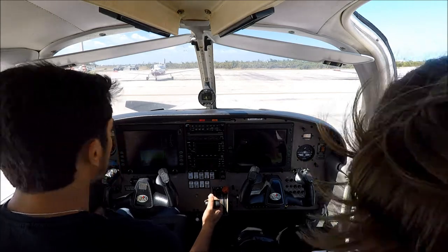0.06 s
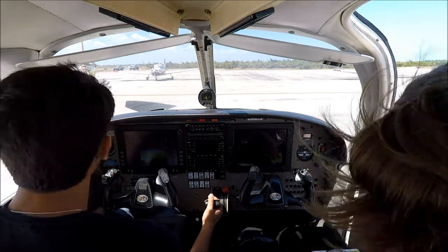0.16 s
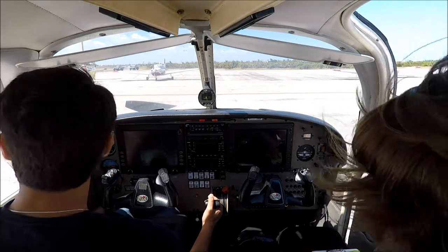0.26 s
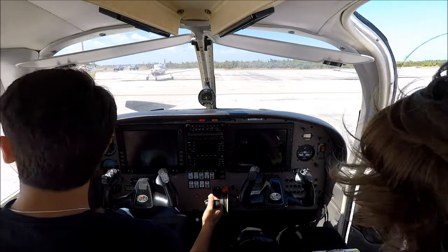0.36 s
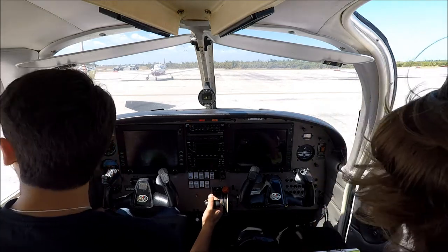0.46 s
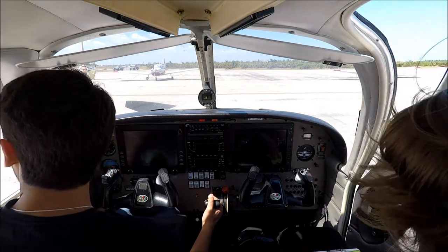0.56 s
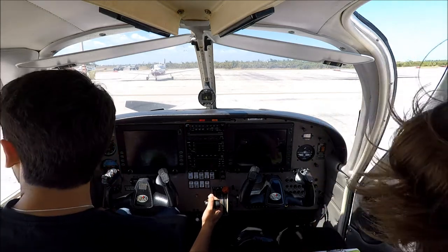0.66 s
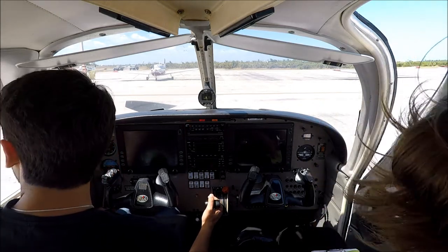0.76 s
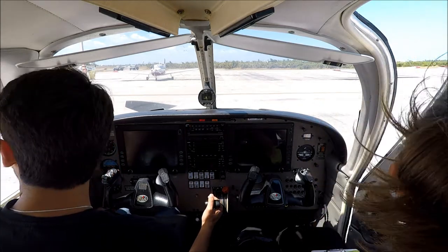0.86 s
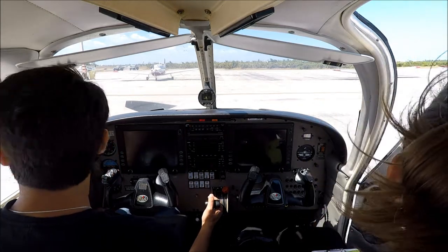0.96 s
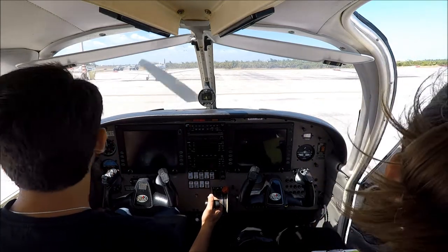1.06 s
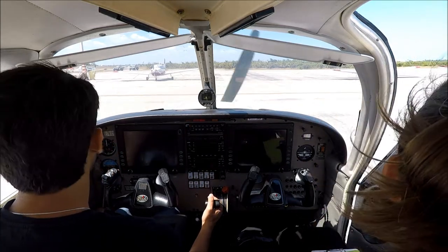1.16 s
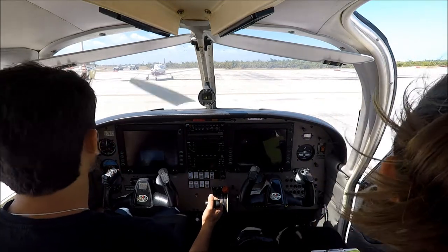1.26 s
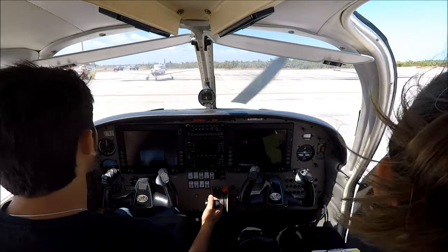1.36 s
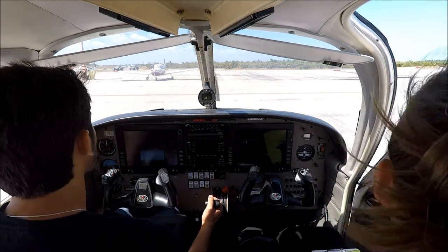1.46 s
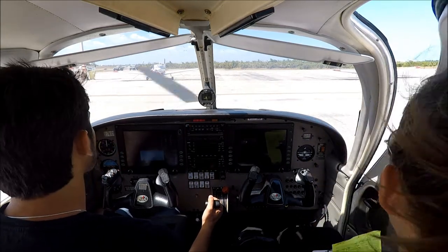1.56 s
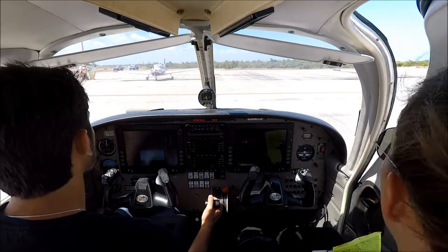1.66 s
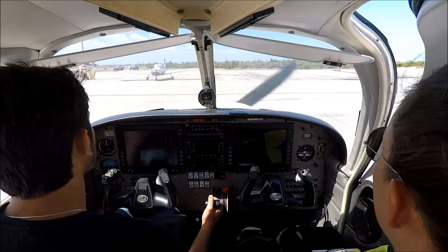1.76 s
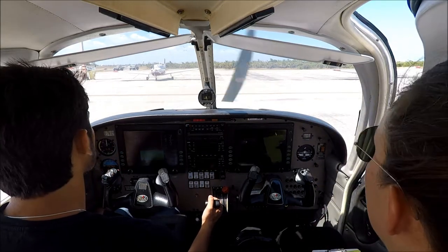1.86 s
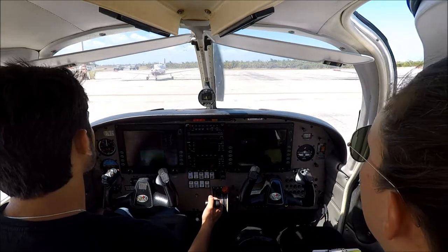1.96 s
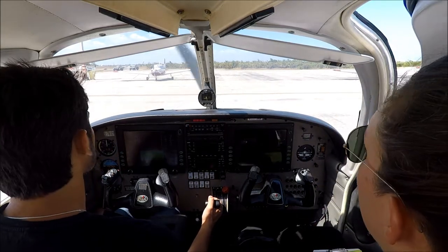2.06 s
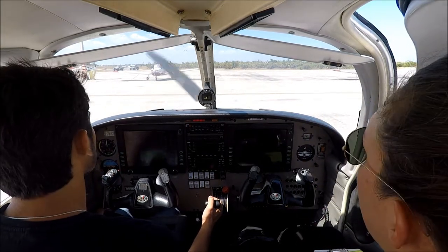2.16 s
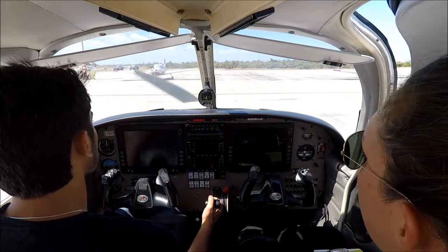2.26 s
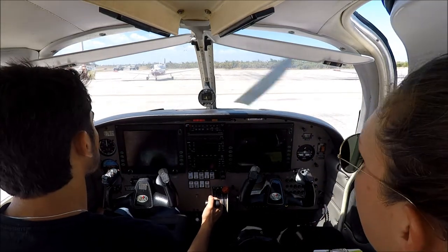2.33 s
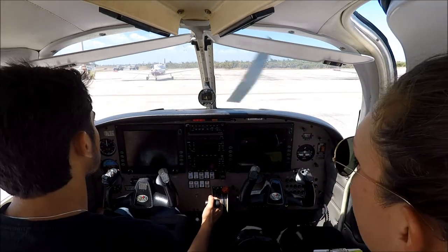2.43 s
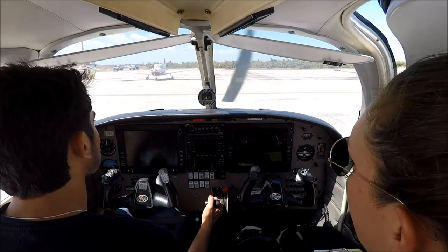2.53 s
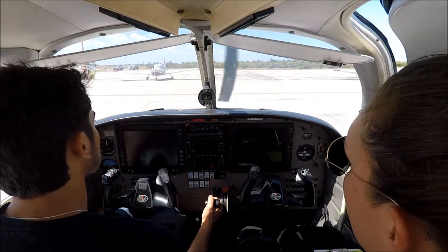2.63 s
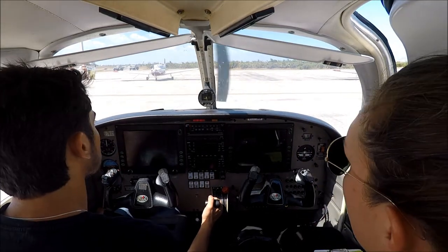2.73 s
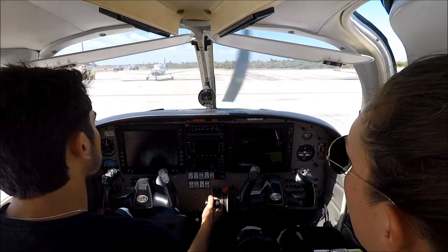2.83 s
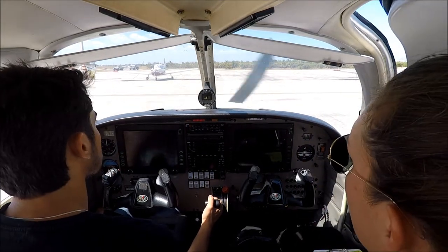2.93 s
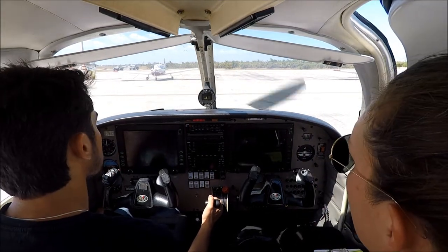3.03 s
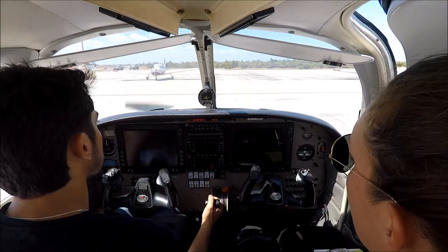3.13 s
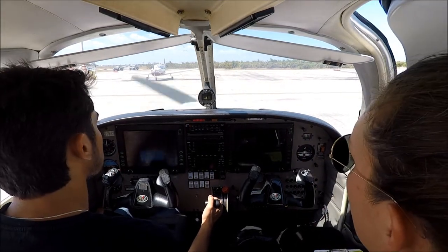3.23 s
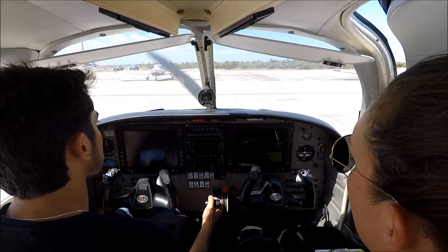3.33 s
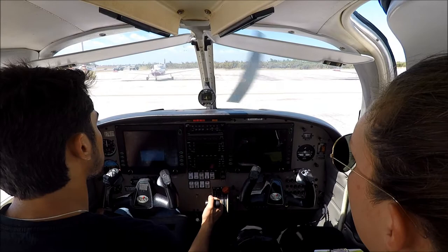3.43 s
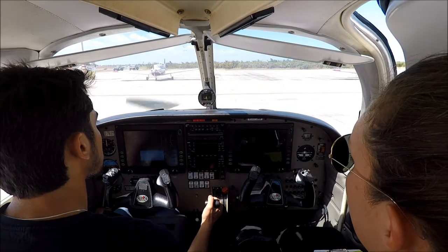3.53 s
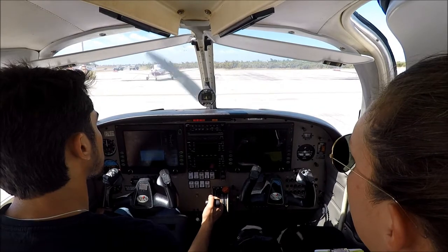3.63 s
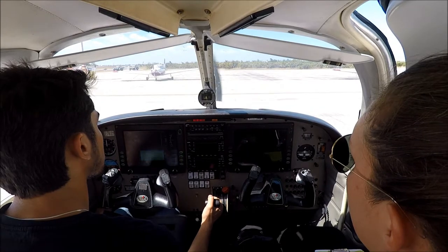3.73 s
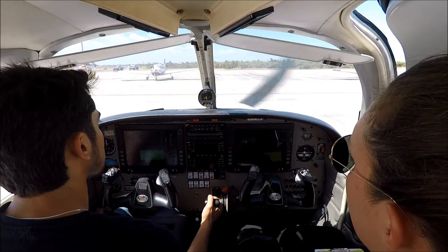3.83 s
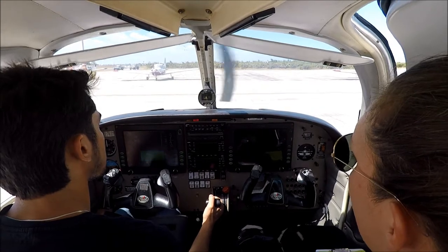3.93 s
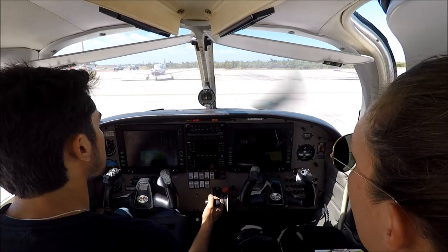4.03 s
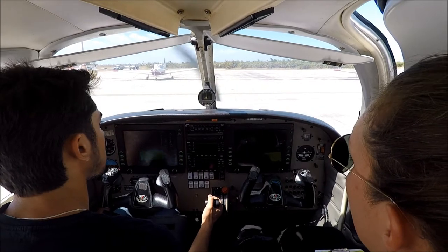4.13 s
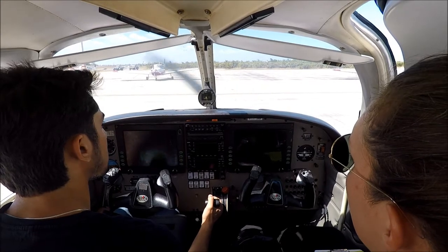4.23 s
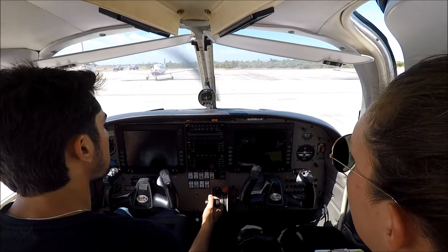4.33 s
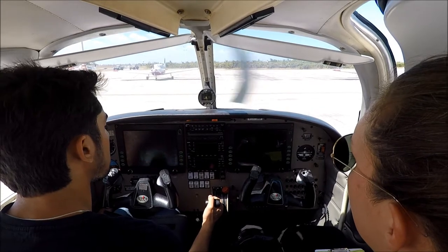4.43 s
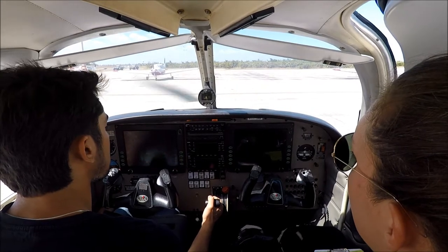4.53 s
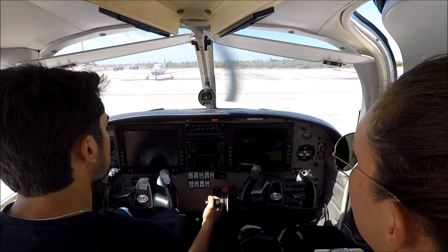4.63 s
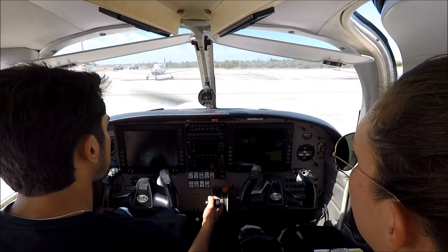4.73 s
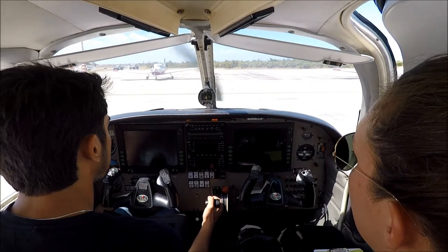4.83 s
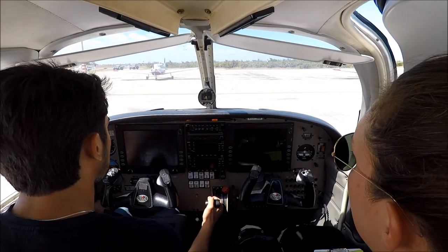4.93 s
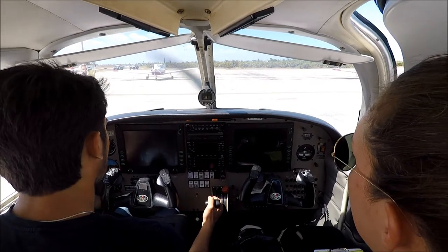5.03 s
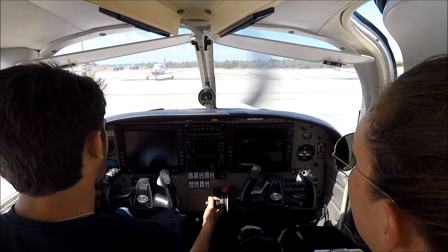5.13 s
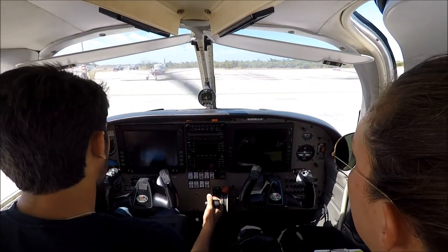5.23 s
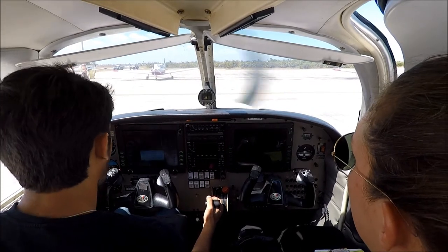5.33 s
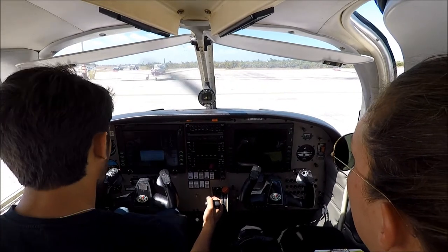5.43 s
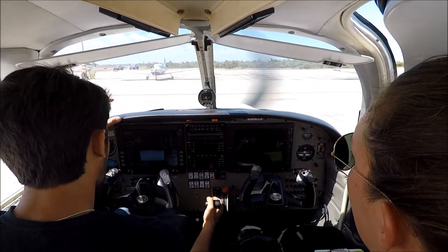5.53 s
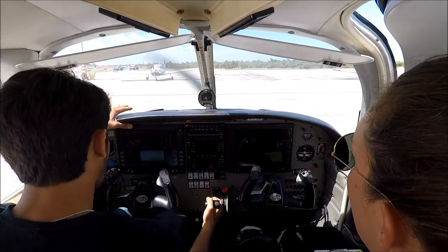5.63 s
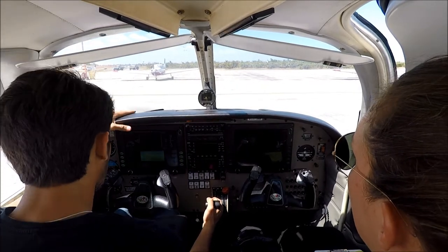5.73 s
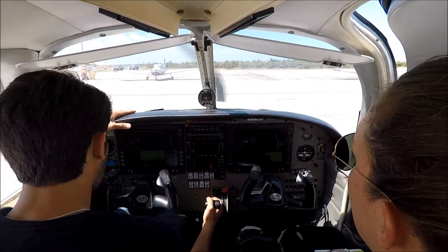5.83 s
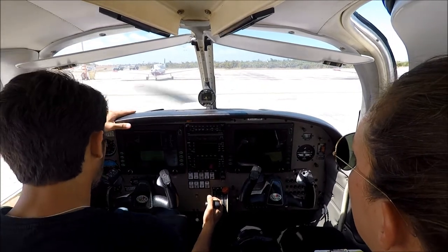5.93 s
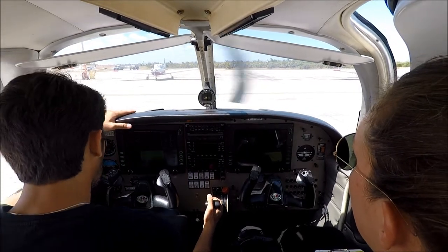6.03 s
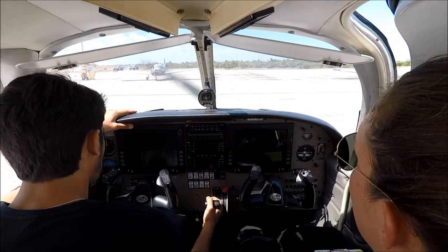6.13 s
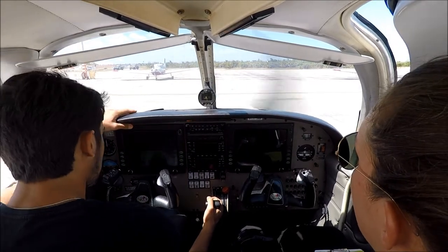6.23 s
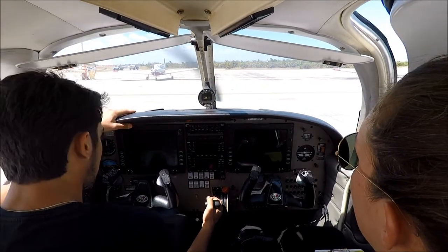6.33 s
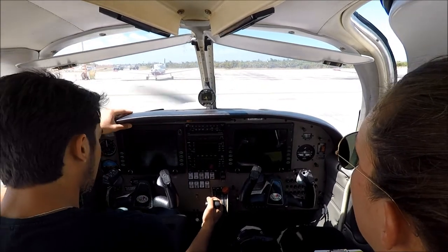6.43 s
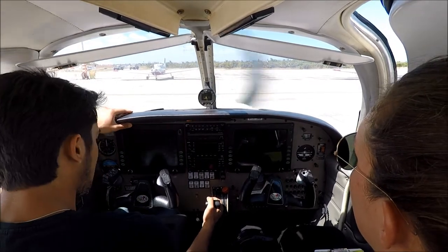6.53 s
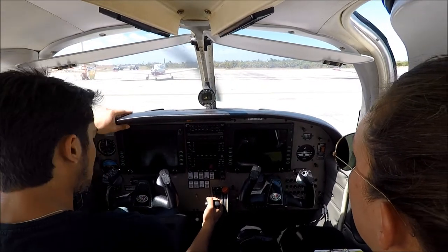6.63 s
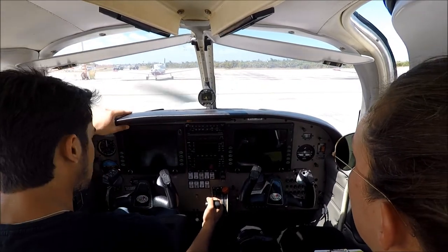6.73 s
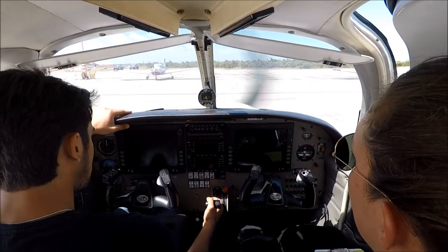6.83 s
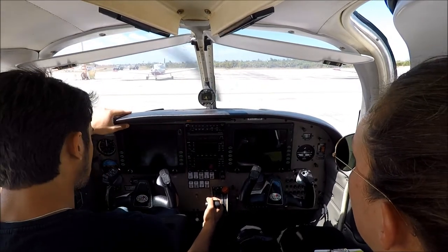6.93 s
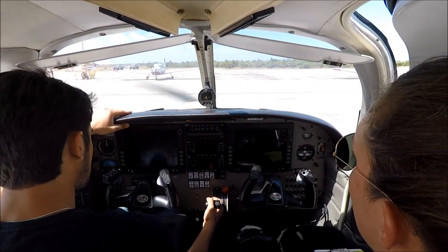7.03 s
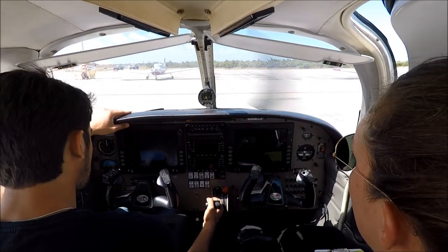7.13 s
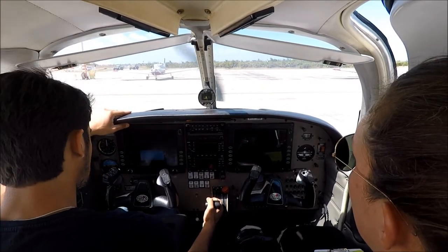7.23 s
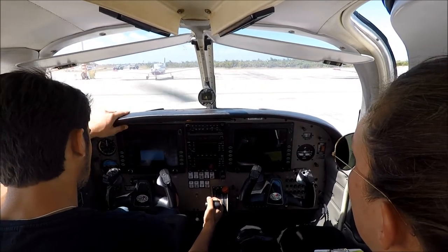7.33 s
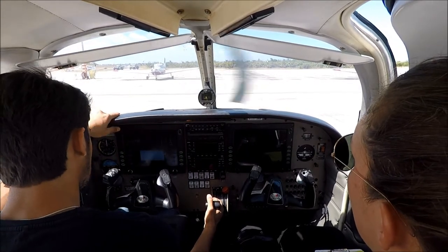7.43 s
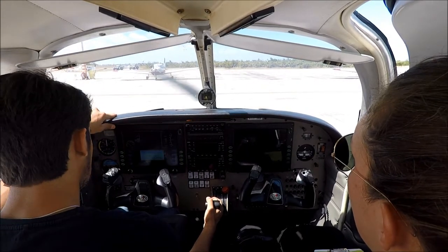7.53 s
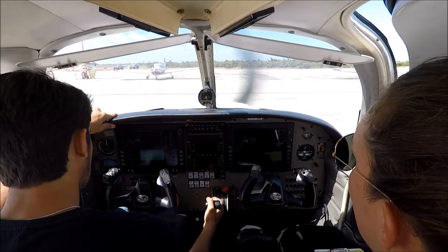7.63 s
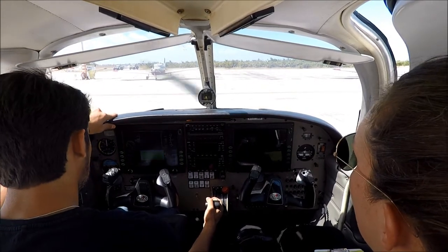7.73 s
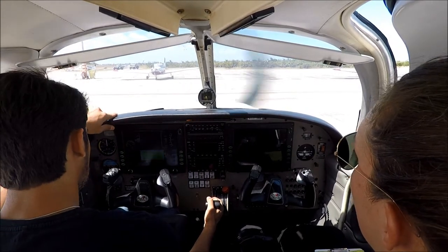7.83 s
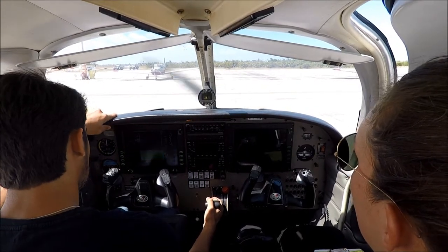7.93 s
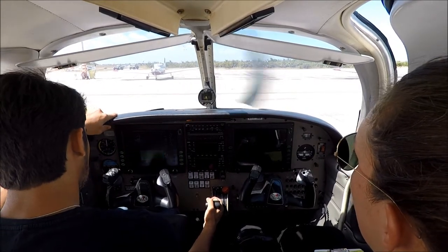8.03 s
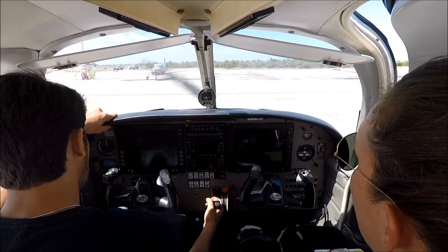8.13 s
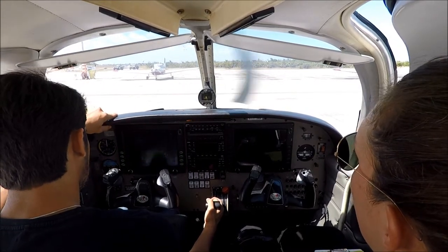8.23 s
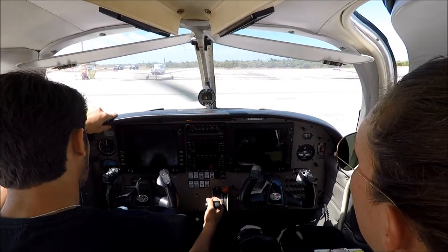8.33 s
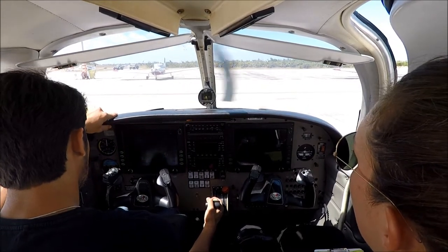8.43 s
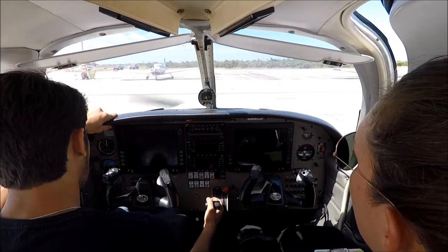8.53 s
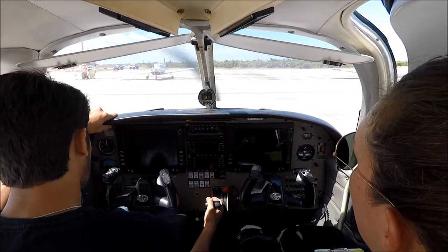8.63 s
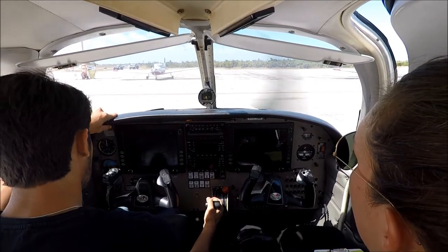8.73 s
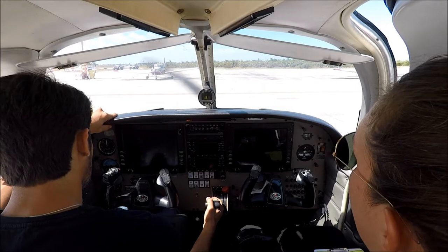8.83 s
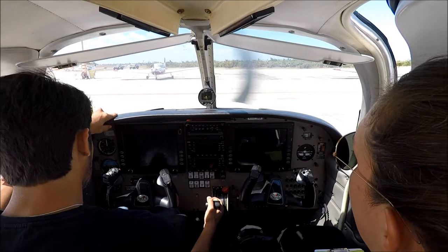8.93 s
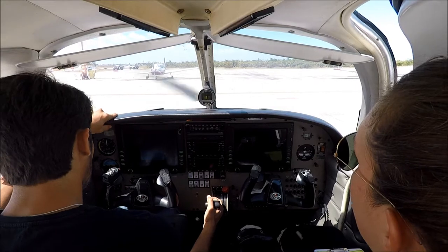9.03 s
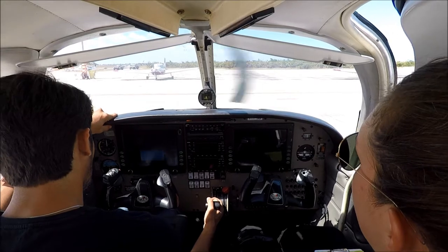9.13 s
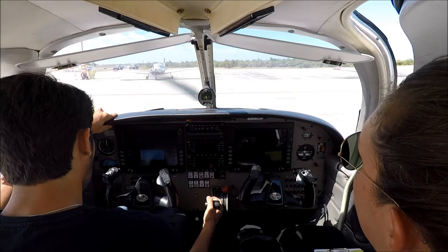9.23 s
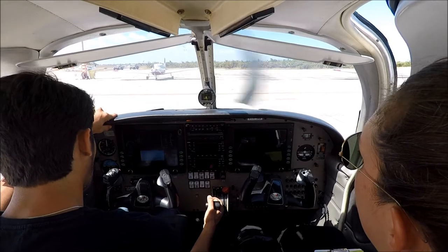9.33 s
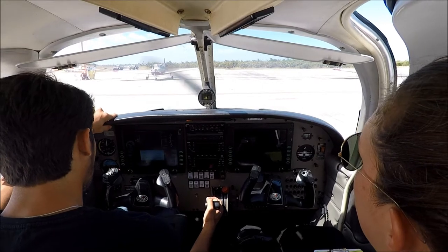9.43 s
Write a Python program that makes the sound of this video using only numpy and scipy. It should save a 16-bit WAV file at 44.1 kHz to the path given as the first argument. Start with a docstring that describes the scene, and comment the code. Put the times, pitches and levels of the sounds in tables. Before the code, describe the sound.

Inside a light aircraft cockpit, a starter whines and chugs, the piston engine coughs, catches with heavy knocks and settles into a throbbing idle.

```python
"""A light aircraft's piston engine, heard from the cockpit, is cranked, coughs, catches and settles to idle.
The idle is exhaust harmonics, gas noise gated by the firings, valve ticks and narrow-band panel buzz.
The starter is gear-mesh harmonics that sag in pitch with each compression, over growl and chatter noise.
Coughs, knocks and clicks are decaying resonances; the airframe shakes as two wavering low tones.
Before them come a switch click, a short hum, a gust, and an engine and a fan as steady tones in noise."""
import sys
import numpy as np
from scipy import signal
from scipy.fft import rfft, irfft
from scipy.io import wavfile
from scipy.ndimage import uniform_filter1d

SR = 44100
rng = np.random.default_rng(int(sys.argv[2]) if len(sys.argv) > 2 else 0)


def pcm_store(signal):
    """Save signal as 16-bit PCM."""
    levels = np.round(np.clip(np.atleast_2d(signal), -1, 1) * 32767)
    wavfile.write(sys.argv[1], SR, levels.astype(np.int16).T)


N = 417627
T = np.arange(N) / SR


def undb(db):
    """Logarithmic level: decibels to amplitude gain."""
    return 10 ** (np.asarray(db) / 20)


def unit(x):
    """Normalisation to an rms of 1."""
    return x / np.sqrt(np.mean(x ** 2) + 1e-18)


def curves(table):
    """Linear interpolation: each column of a table against the times in its first."""
    s, *columns = np.transpose(table)
    return [np.interp(T, s, c) for c in columns]


def gate(start, end, fade):
    """Linear envelope: fades in from start and out to end, both in seconds."""
    return np.clip((T - start) / fade, 0, 1) * np.clip((end - T) / fade, 0, 1)


def noise():
    """White noise: equal mean power at all frequencies."""
    return rng.standard_normal(N)


def walk(rate):
    """Low-passed random modulation: a new step rate times a second, smoothed, with a spread near 1."""
    k = int(SR / rate)
    steps = np.repeat(rng.standard_normal(N // k + 1), k)[:N]
    return 1.2 * uniform_filter1d(steps, k)


def oscillator_angle(hz):
    """Phase accumulation: the angle in radians of a tone whose frequency varies."""
    return 2 * np.pi * np.cumsum(hz) / SR


def colour(x, points, size=4096):
    """Minimum-phase filtering: a causal filter with the given (Hz, dB) response; output at rms 1."""
    hz, db = np.transpose(points)
    f = np.maximum(np.arange(size // 2 + 1) * SR / size, 1)
    octaves_outside = np.maximum(np.log2(hz[0] / f), 0) + np.maximum(np.log2(f / hz[-1]), 0)
    gain_db = np.interp(np.log(f), np.log(hz), db) - np.minimum(24 * octaves_outside, 60)
    # folding the cepstrum onto positive time makes the filter causal
    cepstrum = irfft(np.log(undb(gain_db)))
    cepstrum[1:size // 2] *= 2
    cepstrum[size // 2 + 1:] = 0
    impulse = irfft(np.exp(rfft(cepstrum)))
    return unit(signal.oaconvolve(x, impulse)[:N])


def band(x, hz, width_hz):
    """Simple resonance: a band-pass with gain 1 at its centre."""
    return signal.lfilter(*signal.iirpeak(min(hz, SR / 2 - 1), hz / width_hz, SR), x)


def treble(x, hz):
    """High-pass filtering: the part of a sound above hz."""
    return signal.sosfilt(signal.butter(2, hz, "high", fs=SR, output="sos"), x)


def ring(start, t60, rise=0.00055):
    """Damped decay: a quick rise, then an exponential fall of 60 dB in t60 seconds."""
    out, first = np.zeros(N), int(start * SR)
    age = T[:min(SR // 2, N - first)]
    out[first:first + len(age)] = (1 - np.exp(-age / rise)) * np.exp(-np.log(1000) * age / t60)
    return out


# Speed of the running engine. Each row: time in seconds, mean firings per second.
FIRING_RATE = [(4.25, 29.5), (4.35, 32.3), (4.39, 33.4), (4.51, 34.6), (4.61, 35.1), (4.71, 34.4),
               (4.89, 34.4), (5.88, 36.0), (6.09, 35.9), (6.36, 36.4), (6.49, 36.9), (7.1, 36.8),
               (7.45, 35.9), (7.57, 35.2), (7.96, 35.3), (8.69, 34.1), (9.1, 35.2), (9.45, 35.2)]
# How hard the engine works. Each row: time in seconds, exhaust puff in dB, mechanical clatter in dB.
EFFORT = [(4.2, -33, -41.5), (4.35, -26.5, -35), (4.75, -28, -35), (4.95, -26, -35.5), (5.22, -26, -33),
          (5.5, -26.5, -35), (6.0, -27, -35), (6.45, -27, -35.5), (6.75, -22.5, -34), (7.06, -21.5, -32.5),
          (7.5, -22.5, -31.5), (7.9, -24.5, -34), (8.37, -25.5, -35), (8.78, -27, -36), (9.07, -26, -33),
          (9.3, -22.5, -34)]
# Spectrum of the exhaust puffs. Each row: frequency in Hz, relative level in dB.
PUFF_COLOUR = [(100, 2.5), (160, -1.5), (220, -3.5), (310, -5.5), (430, -10), (520, -15), (700, -18.5),
               (1200, -39)]
# Spectrum of valve gear and gears. Each row: frequency in Hz, relative level in dB.
CLATTER_COLOUR = [(500, 0.5), (800, 2), (1000, 2), (1250, -2), (1600, 1), (1780, -4), (2000, -6.5),
                  (3400, -10.5), (5000, -12), (6100, -16.5), (7200, -30), (9500, -33), (11500, -42),
                  (15000, -74)]
# Spectrum of the propeller wash. Each row: frequency in Hz, relative level in dB.
RUMBLE_COLOUR = [(14, 0.5), (25, -2.5), (50, -1), (80, -5), (120, -9.5), (170, -21)]
# Buzzing cabin panels. Each row: centre in Hz, bandwidth setting in Hz, level in dB against the puffs.
CABIN_PANELS = [(195.4, 80, -7.5), (285, 85, -8), (410, 90, -14)]
# Buzzing cowl panels. Each row: centre in Hz, bandwidth setting in Hz, level in dB against the clatter.
COWL_PANELS = [(989, 300, -12.5), (1453, 260, -10.5), (1677, 240, -11.5)]


def idle():
    """Periodic excitation: four cylinders fire in turn, pulsing exhaust gas, valve gear and panels."""
    hz, = curves(FIRING_RATE)
    puff_db, clatter_db = curves(EFFORT)
    firings = np.cumsum(hz * (1 + .012 * walk(35))) / SR
    count, phase = firings.astype(int), firings % 1
    chance = rng.standard_normal((count[-1] + 1, 2))
    cylinder_db = np.array([0.87, 0.12, 0.46, -1.3])
    strength = undb(cylinder_db[count % 4] + 1.48 * chance[count, 0])
    # propeller wash buffets the cabin
    rumble = undb(-24.5) * colour(noise(), RUMBLE_COLOUR)
    # gas rushes out as each exhaust valve opens; the cabin rounds off the edge
    rush = strength * uniform_filter1d(np.exp(-phase / 0.43), size=400)
    flow = rush + .85
    # each firing also sends a pressure pulse that rings briefly around the cabin
    pulses = cabin(strength * np.diff(count, prepend=0), t60=.06)
    gas = unit(flow * noise()) + undb(-10) * pulses
    puff = unit(treble(colour(gas, PUFF_COLOUR), 158))
    puff = unit(puff + panels(flow, count, CABIN_PANELS))
    # valves seat twice a firing, over the grainy rustle of the gears
    valves = undb(1.6 * chance[count, 1]) * np.exp(-(2 * firings % 1) / 0.062)
    grain = noise() * undb(0.47 * walk(400))
    clatter = colour((rush + 0.034 * valves + 0.44) * grain, CLATTER_COLOUR)
    clatter = unit(clatter + panels(rush + 0.24, count, COWL_PANELS))
    body = (exhaust_tone(firings) + rumble) * gate(4.076, np.inf, 0.26)
    caught = gate(3.75, np.inf, .4)
    return body + (puff * undb(puff_db) + clatter * undb(clatter_db)) * caught


# The four lowest exhaust harmonics. Each row: time in seconds, mean level in dB of the first, second,
# third and fourth (the first before its stumbles).
THROB = [(4.25, -15, -19, -27.5, -45), (4.55, -10.5, -22, -28.5, -30), (5.0, -12.5, -20, -19, -27.5),
         (5.64, -10, -18.5, -27, -32), (5.85, -10.5, -27, -26, -26), (6.55, -10.5, -26, -28, -27.5),
         (6.75, -13.5, -32, -29, -26.5), (7.4, -10, -24, -25.5, -28.5), (8.05, -12, -19, -24, -25),
         (8.75, -10, -26.5, -28, -28.5), (9.3, -12.5, -17.5, -27.5, -30), (9.44, -11, -21, -20.5, -38)]
# Stumbles of the first harmonic. Each row: centre in seconds, change of level in dB.
STUMBLES = [(4.7, -6), (5.28, -3), (5.66, -7), (5.9, -3), (6.6, -5), (6.72, 2.5), (6.98, -16), (7.11, -6),
            (7.31, -5), (7.85, 0.5), (8.08, 0)]
# Weaker exhaust harmonics. Each row: multiple of the firing rate, mean level in dB.
EXHAUST_ORDERS = [(0.5, -27.5), (1.5, -30), (2.5, -34), (3.5, -32.5), (5, -39.5), (6, -40)]


def exhaust_tone(firings):
    """Harmonic series: orders of the firing rate wander in level and phase, and the first stumbles."""
    throb_db, second_db, third_db, fourth_db = curves(THROB)
    stumble_db = sum(db * np.exp(-((T - s) / .022) ** 2) for s, db in STUMBLES)
    orders = [(1, throb_db + stumble_db), (2, second_db), (3, third_db), (4, fourth_db)] + EXHAUST_ORDERS
    uneven = 0.58 * walk(5.8)  # cycles of wander, which blurs the half orders
    tone = 0
    for k, db in orders:
        k = round(2 * k) / 2
        waver_db = min(k, 3) * walk(18)
        # each harmonic has its own starting phase
        cycles = k * firings + k % 1 * uneven + rng.random() + k * .016 * walk(20)
        tone = tone + np.sqrt(2) * undb(db + waver_db) * np.cos(2 * np.pi * cycles)
    return tone


def panels(rush, count, table):
    """Forced vibration: loose panels buzz with each firing, at random strengths and wandering pitch."""
    out = 0
    for hz, width_hz, db in table:
        kick_db = 2.8 * rng.standard_normal(count[-1] + 1)[count] + 1.6 * walk(5)
        angle = oscillator_angle(hz * (1 + .04 * walk(6)))
        # two random quadratures make a narrow band of noise
        buzz = walk(width_hz) * np.sin(angle) + walk(width_hz) * np.cos(angle)
        out = out + undb(db) * unit(buzz * rush * uniform_filter1d(undb(kick_db), size=200))
    return out


def cabin(x, t60):
    """Reverberation: dense, exponentially decaying reflections off glass and panels; output at rms 1."""
    age = T[:SR // 8]
    reflections = rng.standard_normal(len(age)) * undb(-60 * age / t60)
    return unit(signal.oaconvolve(x, reflections)[:N])


# One starter chirp per compression stroke. Each row: start in seconds, gear mesh rate in Hz before spin-up
# and sag, share of the pitch lost over the stroke, relative level in dB, frequency in Hz at which the
# housing sings out, its lift in dB.
STROKES = [(0.998, 1450, 0.38, -35.5, 1850, 2), (1.314, 949, 0.16, -41, 4900, 9),
           (1.488, 1060, 0.15, -38, 3130, 9.5), (1.619, 1140, .18, -36, 3300, 2),
           (1.75, 1172, 0.18, -36, 4400, 1), (1.875, 1232, .17, -37.5, 3650, 4),
           (1.987, 1261, 0.17, -37.5, 3645, 4), (2.098, 1280, .12, -37.5, 4910, 3),
           (2.206, 1272, 0.15, -40, 3650, 9), (2.328, 1295, 0.18, -41, 4900, 13),
           (2.431, 1320, 0.17, -44.5, 3900, 15.5), (2.54, 1332, 0.17, -40.5, 3780, 8),
           (2.647, 1330, 0.11, -40, 5280, 1.5), (2.733, 1500, 0.052, -40.5, 4500, 5),
           (2.83, 1516, 0.076, -44, 6000, 4), (2.936, 1545, 0.082, -37, 4550, 3),
           (3.01, 1526, .08, -43, 6000, 1), (3.102, 1580, 0.078, -37, 6200, -2),
           (3.191, 1556, 0.084, -38, 4580, 4), (3.283, 1530, 0.085, -38.5, 4420, 7),
           (3.364, 1516, 0.068, -45, 5900, 3), (3.44, 1453, 0.098, -56, 5820, 12),
           (3.521, 1533, 0.076, -46, 5950, -7), (3.597, 1586, .07, -46, 6200, 1),
           (3.738, 1580, 0.052, -38.5, 4680, 7.5)]
# Harmonics of the gear whine. Each row: multiple of the mesh rate, relative level in dB.
WHINE_ORDERS = [(1, -3.5), (2, 0.5), (3, 0), (4, -2), (5, -14), (6, -3), (7, -11), (8, -8), (9, -2),
                (10, -1)]
# Response of the gear housing. Each row: frequency in Hz, gain in dB.
WHINE_COLOUR = [(800, 0), (1200, 0), (1850, 3), (2400, -12), (3100, -7), (3700, -7), (4800, -5.5),
                (6000, -6.5), (6700, -22), (7400, -17), (8300, -19.5), (10000, -28), (13500, -33),
                (15000, -45)]
# Spectrum of sliding teeth. Each row: frequency in Hz, relative level in dB.
GEAR_COLOUR = [(300, 9), (900, 4.5), (1300, 2.5), (1850, 2.5), (2400, 1.5), (3700, -3), (5000, -5),
               (6200, -9.5), (7300, -25.5), (8400, -16.5), (10500, -23.5), (13500, -30), (15000, -45)]
# Spectrum of teeth chattering under load. Each row: frequency in Hz, relative level in dB.
CHATTER_COLOUR = [(200, -4), (450, 3.5), (600, 1), (720, -3.5), (860, -3), (1050, 7), (1350, -6), (1800, 4),
                  (2600, -9), (5500, -9), (7200, -22)]
# Pistons thud louder as fuel begins to burn; the growl follows. Each row: time in seconds, level in dB.
THUDS = [(1.0, -33), (1.35, -29), (1.6, -31.5), (2.2, -30), (2.75, -22), (3.2, -26.5), (3.65, -27.5),
         (3.95, -22), (4.25, -35.5)]
CRANK_FROM_S, RELEASE_S = .965, 3.82  # the starter begins to turn; its last stroke ends


def starter():
    """Gear-mesh excitation: tooth harmonics sag in pitch on each compression, over growl and chatter."""
    starts = [row[0] for row in STROKES]
    strokes = np.interp(T, np.append(starts, RELEASE_S), np.arange(len(starts) + 1))
    index = np.minimum(strokes.astype(int), len(starts) - 1)
    _, top_hz, sag, stroke_db, sing_hz, sing_db = np.array(STROKES)[index].T
    travel = np.clip(strokes - index, 0, 1)
    # the motor gathers speed with a time constant of 0.11 s
    spin_up = 1 - np.exp(-np.maximum(T - CRANK_FROM_S, 0) / 0.11)
    mesh_hz = top_hz * spin_up * (1 - sag * travel)
    # an exponent under 1 makes each chirp swell faster than it fades
    effort = np.sin(np.pi * travel ** 0.57) ** 2
    tooth = oscillator_angle(mesh_hz * (1 + .011 * walk(70) + .009 * walk(700)))
    # uneven teeth add weak partials between the harmonics
    orders = WHINE_ORDERS + [(k - .5, db - 7) for k, db in WHINE_ORDERS]
    whine = 0
    for k, db in orders:
        k = round(2 * k) / 2
        partial_hz = k * mesh_hz
        housing_db = np.interp(partial_hz, *np.transpose(WHINE_COLOUR))
        housing_db = housing_db + sing_db * np.exp(-((partial_hz - sing_hz) / 300) ** 2)
        # backlash roughens each partial in level and phase
        partial = (1 + .65 * walk(260)) * np.sin(k * tooth + .55 * walk(300))
        whine = whine + undb(db + housing_db + 2.5 * walk(40)) * partial
    singing = undb(stroke_db) * np.sqrt(effort) * whine
    # the sliding teeth also grind, then chatter as the piston nears the top
    grind = undb(-40) * effort * colour(noise() * undb(3.8 * walk(300)), GEAR_COLOUR)
    load = np.sin(np.pi * travel ** 1.25) ** 4
    chatter = undb(-39) * load * colour(noise() * undb(5 * walk(350)), CHATTER_COLOUR)
    # the growl follows 0.65 of the pistons' rise in dB
    thud_db, = curves(THUDS)
    growl_db = -43.5 + 3.5 * effort + 0.65 * (thud_db - thud_db.min())
    growl = colour(noise(), GEAR_COLOUR) * undb(growl_db)
    growl = growl * gate(CRANK_FROM_S, np.inf, 0.044) * gate(0, 4.42, 0.49)
    return singing + grind + chatter + growl


# Hard, uneven firings. Each row: start in seconds, relative level in dB, exhaust ring in Hz.
COUGHS = [(0.972, -7, 72), (1.006, -16, 86.5), (2.745, -14, 138.8), (2.836, -7.5, 105.2),
          (2.926, -14, 107.5), (2.952, -31, 100), (3.015, -11, 109.7), (3.337, -9, 91.2),
          (3.799, -10, 92.7), (3.867, -6, 81), (3.882, -5.5, 102.4), (4.815, -28, 110),
          (9.241, -13.5, 111.5)]
# Spectrum of the gas bursts. Each row: frequency in Hz, relative level in dB.
COUGH_COLOUR = [(65, -13), (100, 4.5), (150, 0), (230, -6.5), (370, -5), (550, -23), (900, -15.5),
                (1600, -21)]
# Resonances of the exhaust pipe. Each row: multiple of its ring, relative level in dB.
PIPE = [(1, -0.5), (1.75, -11.5), (3.75, -18)]


def first_firings():
    """Impulsive pipe excitation: pistons thud, and each cough rings the exhaust and bursts with gas."""
    burst = sum(undb(db - 8.5) * ring(s, t60=0.13) for s, db, _ in COUGHS)
    thumps = np.zeros(N)
    for s, db, hz in COUGHS:
        swell = undb(db) * ring(s, t60=0.15, rise=0.0039)
        live = swell > 0
        age = T[live] - s
        modes = sum(undb(mode_db) * np.sin(2 * np.pi * k * hz * age) for k, mode_db in PIPE)
        thumps[live] += swell[live] * modes
    thud_colour = [(80, 12.5), (120, 5.0), (170, -2), (240, 0),
                   (330, -5.0), (500, -10.5), (800, -8.5), (1300, -18.5)]
    thuds = colour(noise() * undb(2.9 * walk(90)), thud_colour) * undb(curves(THUDS)[0])
    thuds = thuds * gate(CRANK_FROM_S, np.inf, 0.018) * gate(0, 4.48, 0.15)
    return colour(noise(), COUGH_COLOUR) * burst + thumps + thuds


# The pinion slams into the ring gear and rebounds. Each row: time in seconds, level in dB.
ENGAGE = [(0.9623, -10.5), (0.99, -24), (1.04, -28)]
# Modes of the ring gear. Each row: mean frequency in Hz, decay by 60 dB in seconds, relative level in dB.
RING_GEAR = [(1240, 0.077, 0), (1420, 0.051, 4), (1545, 0.049, 3), (1665, 0.07, -1), (1900, 0.061, 0),
             (2120, .05, -6), (3590, 0.085, -7), (3540, .07, -10), (4030, 0.071, -21), (5000, .1, -21)]
# Knocks of starter drive and engine. Each row: time in seconds, relative level in dB, relative treble in dB.
KNOCKS = [(0.683, -28, -26), (0.961, -12.5, -9.5), (0.983, -11, -12), (1.005, -13, -13), (1.027, -20, -14),
          (1.059, -19.5, -10), (1.262, -26, -10), (1.378, -21.5, -24), (1.572, -20, -16),
          (1.695, -23.5, -14), (1.812, -17.5, -19), (1.935, -21, -17), (2.045, -22, -12), (2.157, -22, -15),
          (2.25, -21.5, -15), (2.383, -23, -17), (2.452, -31, -10), (2.603, -24, -14), (2.751, -17.5, -21),
          (2.837, -13, -19), (2.933, -19.5, -14), (3.025, -22.5, -9), (3.334, -15.5, -14),
          (3.527, -20, -31), (3.603, -18, -17), (3.678, -21, -27), (3.798, -5, -11.5), (3.83, -13.5, -11.5),
          (3.868, -9.5, -15.5), (3.904, -16, -8.5), (5.041, -29, -18), (6.201, -26, -20), (6.722, -39, -16),
          (7.406, -25, -18), (7.462, -31, -18), (8.666, -32, -18)]
# Spectrum of the rattling cowling. Each row: frequency in Hz, relative level in dB.
KNOCK_COLOUR = [(300, -1), (700, 1.5), (1000, -2.5), (1250, -4), (1700, 1), (2400, -1.5), (3800, -8),
                (5800, -18.5), (7400, -33), (10000, -33), (15000, -51)]
# Modes of the crankcase. Each row: mean frequency in Hz, decay by 60 dB in seconds, relative level in dB.
CRANKCASE = [(406, .09, 3.5), (490, 0.073, -3), (720, .13, -0.5), (1006, 0.27, -8), (1125, 0.065, -7),
             (1736, 0.085, 0.5), (1888, 0.076, -5), (2310, 0.15, -15), (3630, 0.1, -14), (3900, 0.082, -15),
             (4950, .09, -16)]


def knocks():
    """Impact excitation: blows ring the crankcase and rattle the cowling; the ring gear clangs."""
    rattle = colour(noise() * undb(1.5 * walk(570)), KNOCK_COLOUR)
    bright, dull = treble(rattle, 2720), band(rattle, 760, 3140)
    # blows start slightly early to allow for their rise
    out = sum(undb(db) * clank(s - .003, RING_GEAR, rise=0.0026) for s, db in ENGAGE)
    for s, db, treble_db in KNOCKS:
        shake = undb(-4) * dull + undb(treble_db + 11) * bright
        shake = shake * ring(s - .002, t60=0.13, rise=.003)
        clang = undb(-1.5) * clank(s - .002, CRANKCASE, rise=0.0025)
        out = out + undb(db - 3) * (shake + clang)
    return out


def clank(start, modes, rise):
    """Modal vibration: a struck casting rings in damped modes, varied at each blow; starts near rms 1."""
    hz, t60, db = np.transpose(modes)[:, :, None]
    strength, detune, phase = rng.standard_normal((3, len(modes), 1))
    gain, age = undb(db + 3 * strength), T[:SR // 4]
    cycles = hz * (1 + .015 * detune) * age + phase
    tones = gain * undb(-60 * age / t60) * np.sin(2 * np.pi * cycles)
    blow = tones.sum(axis=0) * (1 - np.exp(-age / rise)) / np.sqrt(np.sum(gain ** 2) / 2)
    out, first = np.zeros(N + len(age)), int(start * SR)
    out[first:first + len(age)] = blow
    return out[:N]


# The pinion meshes and retracts. Each row: time in seconds, relative level in dB, ring in Hz.
CLICKS = [(1.0074, -33, 5020), (1.06, -38, 6120), (3.9222, -17.5, 5430), (3.9835, -26, 5500),
          (4.0644, -35, 5450), (4.1365, -42, 5330)]
# Spectrum of the pinion's tick. Each row: frequency in Hz, relative level in dB.
PINION_SNAP = [(1500, 6), (2800, 15), (4500, 13), (7000, -4), (10000, -22), (14500, -16)]
# A panel switch. Each row: time in seconds, relative level in dB, ring in Hz.
SWITCH = [(0.1216, -16.5, 7100)]
# Spectrum of the switch's tick. Each row: frequency in Hz, relative level in dB.
SWITCH_SNAP = [(400, 18), (900, 9), (1600, 5), (2800, 17), (4500, 1), (7000, 2), (10000, -6), (14500, -8)]


def clicks(table, snap_colour):
    """Transient excitation: small steel parts snap home with a broad tick and a short high ring."""
    snap = colour(noise(), snap_colour)
    out = 0
    for s, db, hz in table:
        ping = unit(band(band(noise(), hz, 1300), hz, 1800)) * ring(s, t60=0.081, rise=0.0016)
        tick = undb(-2) * snap * ring(s, t60=.045, rise=.0005)
        out = out + undb(db - 6.5) * (ping + tick)
    return out


# The engine shakes the airframe. Each row: time in seconds, mean rocking in dB, mean cabin boom in dB.
SHAKE = [(0.9, -17, -17.5), (1.1, -13, -18), (1.5, -13, -25.5), (2.15, -10.5, -28.5), (2.35, -16, -17.5),
         (2.7, -19, -11), (2.9, -14, -17), (3.3, -10, -23.5), (4.0, -12.5, -19), (4.3, -14.5, -13)]


def airframe():
    """Low-frequency resonance: the turning engine lurches on its mounts and makes the cabin boom."""
    rock_db, boom_db = curves(SHAKE)

    def sway(hz, wander):
        """Frequency modulation: a tone at rms 1 with a wandering pitch."""
        return np.sqrt(2) * np.sin(oscillator_angle(hz * (1 + wander * walk(28))))

    rock = sway(27.9, wander=0.28) * undb(rock_db + 1.2 * walk(36))
    boom = sway(53.36, wander=0.0907) * undb(boom_db + 2 * walk(12))
    return (rock + boom) * gate(0.796, 4.35, 0.11)


def hum():
    """Harmonic tone: something in the cabin buzzes briefly on one low note with two overtones."""
    hz, start_s, end_s = 166.7, .78, .866
    tone = sum(undb(db) * np.cos(2 * np.pi * k * hz * T) for k, db in [(1, 0), (2, -14), (3, -26)])
    return unit(tone) * undb(-16) * gate(start_s, np.inf, 0.024) * gate(0, end_s, 0.012)


def gust():
    """Turbulent pressure: wind through the open door buffets each microphone port alone and dies away."""
    wind_colour = [(30, -10), (120, 0.5), (220, -5.0), (430, -8.0), (900, -26.0), (2000, -45.5)]
    ports = [colour(noise() * undb(2 * walk(28.6)), wind_colour) for _ in range(2)]
    # falls 24 dB per second under a straight fade
    level_db = np.array([[-20], [-23]]) - 24.0 * T
    return np.array(ports) * undb(level_db) * gate(-1, 1.0, 0.79)


# Spectrum of the air on the apron. Each row: frequency in Hz, relative level in dB.
APRON_COLOUR = [(20, 3.5), (60, 4), (130, -6), (320, -12), (520, -20.5), (950, -21), (1200, -32.5),
                (1550, -27.5), (2100, -38), (2800, -33), (7000, -46), (10000, -49), (14000, -65)]
# Drone of the other engine and cockpit fans. Each row: mean frequency in Hz, mean peak level in dB.
APRON_TONES = [(43.3, -21.5), (65, -28.5), (670, -51), (721, -47.5), (1523, -51.5), (1812, -54.5),
               (2428, -56.5)]


def apron():
    """Superposition: another engine and cockpit fans, tones over noise, fade out as the starter gets going."""
    air = colour(noise(), APRON_COLOUR) * undb(-26) * undb(.7 * walk(12))
    # one cockpit fan is still gathering speed, 83 Hz per second
    lines = APRON_TONES + [(924 + 83 * T, -46)]
    tones = 0
    for hz, db in lines:
        level = undb(db + 1.5 * walk(12))
        tones = tones + level * np.sin(oscillator_angle(hz * (1 + .008 * walk(70))))
    return (air + tones) * gate(-1, 1.19, 0.15)


def scene():
    """Linear superposition: all sources add; only the wind and the near switch differ between the ears."""
    engine = idle() + starter() + first_firings() + knocks() + clicks(CLICKS, PINION_SNAP) + airframe()
    switch = np.array([undb(db) * clicks(SWITCH, SWITCH_SNAP) for db in (1, 3)])
    return engine + switch + hum() + gust() + apron()


def record(dry):
    """Soft saturation and band limiting: the highest peaks are rounded and the top is cut at 15.2 kHz."""
    rounded = dry / (1 + (dry / .95) ** 8) ** (1 / 8)
    return signal.sosfilt(signal.ellip(8, .2, 70, 15200, fs=SR, output="sos"), rounded)


dry = scene()
out = record(dry)
pcm_store(out)
```